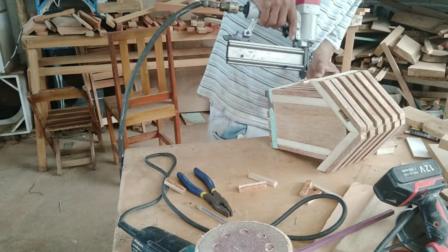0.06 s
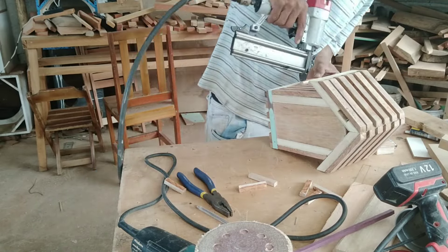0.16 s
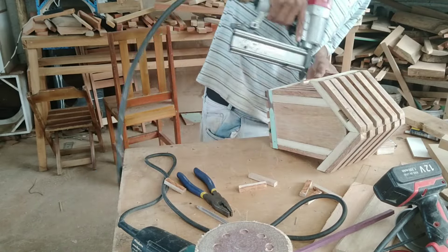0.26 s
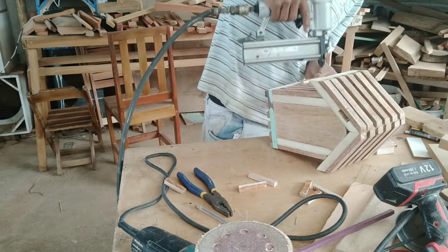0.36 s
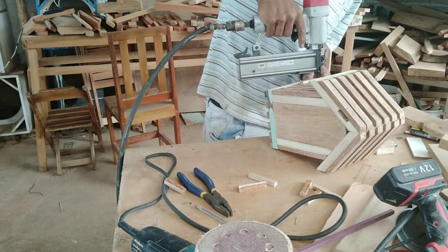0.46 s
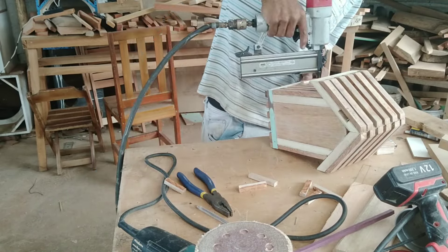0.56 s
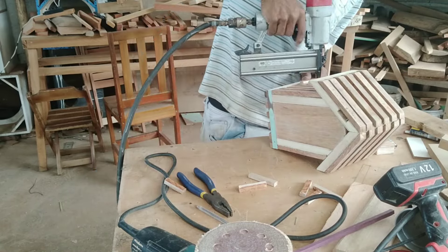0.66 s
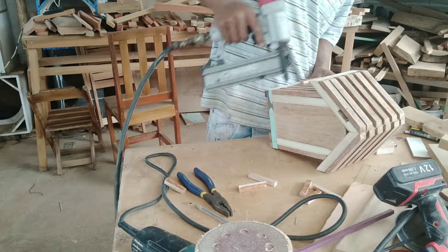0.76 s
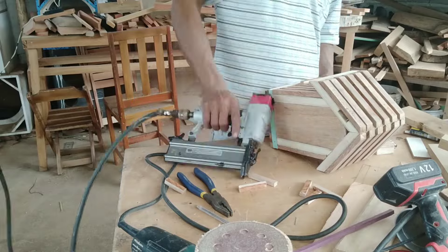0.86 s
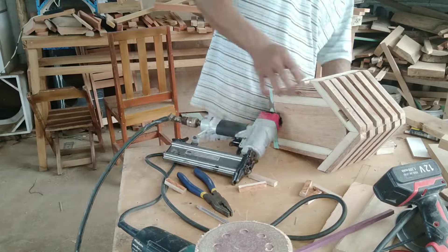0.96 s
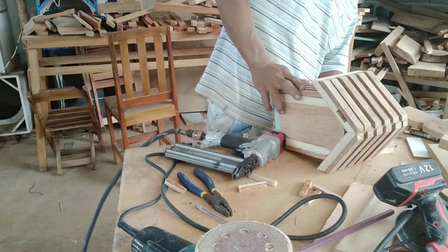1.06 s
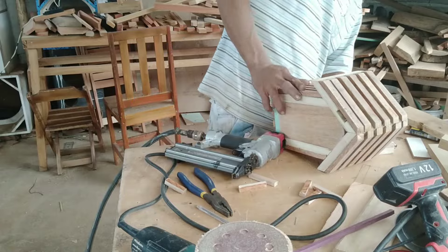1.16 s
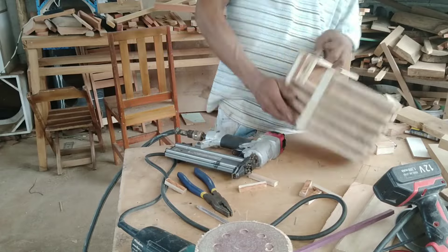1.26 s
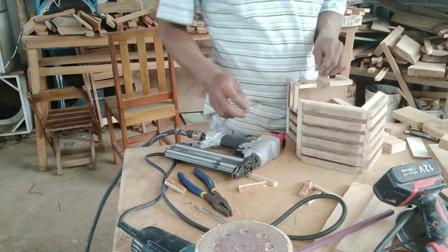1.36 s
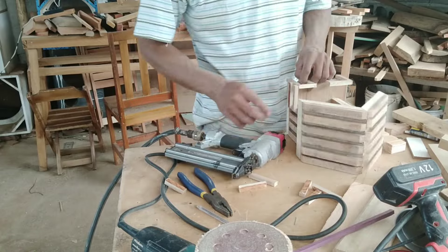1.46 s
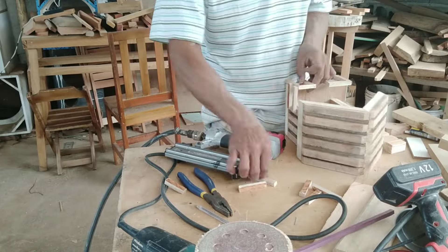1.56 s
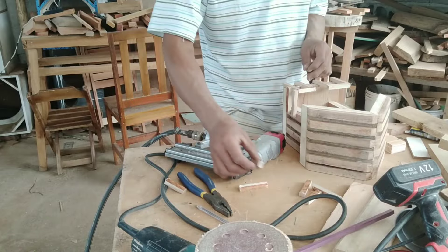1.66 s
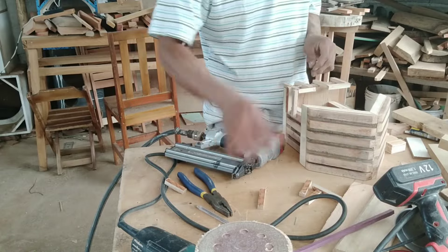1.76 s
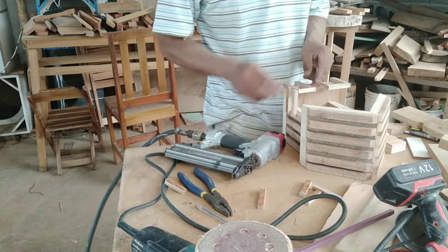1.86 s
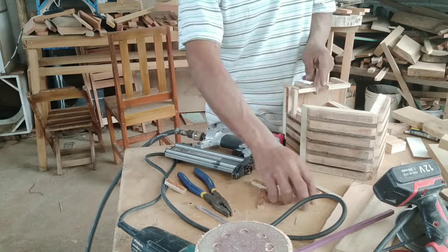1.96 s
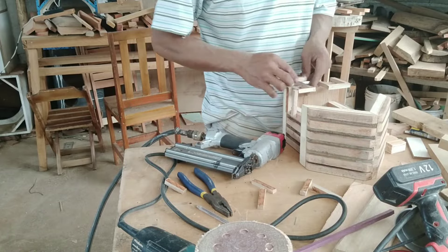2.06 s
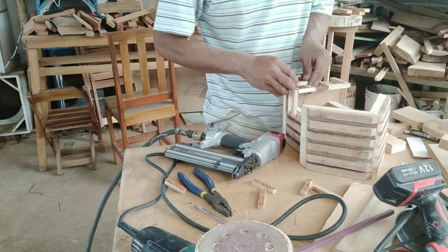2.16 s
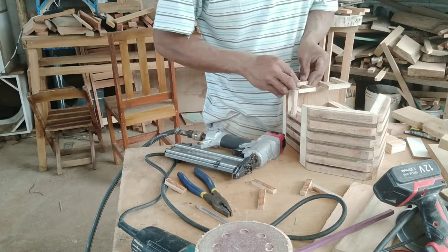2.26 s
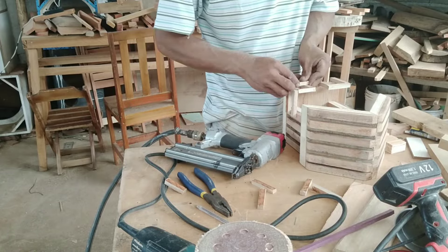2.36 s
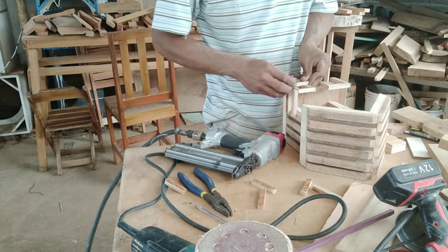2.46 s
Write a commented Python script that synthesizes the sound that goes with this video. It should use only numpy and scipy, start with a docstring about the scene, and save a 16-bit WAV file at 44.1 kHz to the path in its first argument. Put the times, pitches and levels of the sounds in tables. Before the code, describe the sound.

An air nailer fires twice, close and slightly overloaded, the first shot harder. It is set down on a wooden bench, a slatted box knocks over upright, then faint slat rubs, in a dry cluttered workshop.

```python
"""In a workshop, an air nailer fires twice into a slatted wooden box, close to the microphone.
Each shot mixes valve air and exhaust (shaped noise), driver blows (noise, gliding sine, ringing modes)
and piston thumps (modes). The nailer is put down on the bench and the box is tipped upright: noise
knocks over ringing modes. A small slat is picked up and rubbed into place with gritty noise and a
wavering squeak. Rumble, a changing hiss and a faint, dull, unevenly wavering noise lie beneath."""
import sys
import numpy as np
from scipy import signal
from scipy.fft import rfft, irfft
from scipy.io import wavfile
from scipy.ndimage import uniform_filter1d

SR = 44100
rng = np.random.default_rng(int(sys.argv[2]) if len(sys.argv) > 2 else 0)


def wav_out(sig):
    """Save sig, one row per channel (or a flat mono array), as 16-bit PCM at SR to the path in sys.argv[1]."""
    wavfile.write(sys.argv[1], SR, np.round(np.clip(np.atleast_2d(sig).T, -1, 1) * 32767).astype(np.int16))


N = 110250  # samples, 2.5 s


def amp(db):
    """Decibels to gain."""
    return 10 ** (np.asarray(db) / 20)


def unit(x):
    """Scales to rms 1."""
    return x / np.sqrt(np.mean(x ** 2) + 1e-20)


def read(points, hz):
    """Reads a table on a log-frequency axis."""
    f, value = np.transpose(points)
    return np.interp(np.log(hz + 1), np.log(f), value)


def silence():
    """An empty two-port track."""
    return np.zeros((2, N))


def add(mix, s, sound):
    """Mixes a sound in at s seconds, cut off where the track ends."""
    part = mix[:, max(round(s * SR), 0):][:, :sound.shape[-1]]
    part += sound[..., :part.shape[1]]


def clock(size=16384):
    """Time axis of one event in seconds."""
    return np.arange(size) / SR


# How alike the two microphone ports hear noise. Each row: frequency in Hz, likeness (limited to 0..1).
LIKENESS = [(60, 0.73), (150, 0.93), (300, 1.02), (650, 0.6), (1400, 0.38), (3000, 0)]


def noise(spectrum, tilt_db=0, size=16384):
    """Coloured noise of rms 1, alike at both ports in the bass and unlike in the treble."""
    hz = np.fft.rfftfreq(size, 1 / SR)
    a, b = rfft(rng.standard_normal((2, size)))
    same = np.clip(read(LIKENESS, hz), 0, 1)
    pair = np.array([a, same * a + np.sqrt(1 - same ** 2) * b])
    tilt = tilt_db * np.log2(np.maximum(hz, 300))  # dB per octave above 300 Hz
    return unit(irfft(pair * amp(read(spectrum, hz) + tilt), size))


def envelope(rise, hold, t60):
    """Linear attack, hold until `hold` seconds from the start, then exponential release."""
    t = clock()
    return np.minimum(t / rise, 1) * amp(-60 * np.maximum(t - hold, 0) / t60)


def grain(depth_db, size=40):
    """Uneven level of turbulence or friction, smoothed over `size` samples."""
    swing = unit(uniform_filter1d(rng.standard_normal(len(clock())), size))
    return unit(amp(depth_db * swing))


def ring(modes, pitch=1, detune=.004):
    """Dying modes of a struck object, each detuned a little at every blow."""
    t, out = clock(), 0
    for hz, db, t60 in modes:
        mode_hz = hz * pitch * (1 + detune * rng.uniform(-1, 1))
        out = out + amp(db - 60 * t / t60) * np.sin(2 * np.pi * mode_hz * t)
    return out


# Colour of the low rumble. Each row: frequency in Hz, level in dB.
RUMBLE = [(20, 3), (65, 3.5), (105, 3.5), (150, -7.5), (280, -13.5), (700, -17.5), (1100, -32), (4000, -64)]
# Colour of the hiss. Each row: frequency in Hz, level in dB.
HISS = [(130, 6), (280, -3.5), (550, 3.5), (900, -2), (2600, -4), (3600, -16.5), (5500, -22), (8000, -35),
        (16000, -48.5)]
# Level curve of the hiss. Each row: time in seconds, level in dB.
HISS_LEVEL = [(0, -42), (1.06, -45), (1.119, -81), (1.249, -66.5), (1.338, -34.5), (1.42, -75.5),
              (1.531, -63.5), (1.6, -53.5), (2.01, -52), (2.08, -84)]
# Colour of wood rubbing on wood, also darkened here for the wavering noise.
# Each row: frequency in Hz, level in dB.
RUB = [(150, -13), (300, -8), (480, 6.5), (900, 2.5), (2100, 4.5), (3200, -3.5), (5500, -5.5),
       (7000, -22.5), (16000, -58.5)]
RUMBLE_DB, WAVER_DB, WAVER_SWING_DB = -46, -68.5, 2


def background():
    """A steady low rumble, a hiss that sinks and returns, and a faint, dull, unevenly wavering noise."""
    hiss_db = np.interp(np.arange(N) / SR, *np.transpose(HISS_LEVEL))
    swing = unit(uniform_filter1d(rng.standard_normal(N), size=2000))
    rumble = amp(RUMBLE_DB) * noise(RUMBLE, size=N)
    hiss = amp(hiss_db) * noise(HISS, size=N)
    waver = amp(WAVER_DB + WAVER_SWING_DB * swing) * noise(RUB, tilt_db=-8, size=N)
    return rumble + hiss + waver


# Decay of the workshop. Each row: frequency in Hz, t60 in seconds.
ROOM = [(60, 0.12), (1500, 0.076), (6000, 0.084), (16000, 0.07)]


def room(x):
    """Short diffuse tail of the cluttered workshop: noise dying at its own rate in each band."""
    hz, t, z = signal.stft(rng.standard_normal((2, SR // 2)), SR, nperseg=256)
    decay = amp(-60 * t / read(ROOM, hz)[:, None])
    tail = signal.istft(z * decay, SR, nperseg=256)[1]
    tail = tail * np.minimum(np.arange(tail.shape[1]) / SR / 0.0074, 1)  # fades in over 7.4 ms
    return signal.fftconvolve(x, tail / np.linalg.norm(tail[0]), axes=1)[:, :N]


ECHO_DB, ECHO_SPAN_S = -9, .004


def near_echoes(x, count=6):
    """The bench and slats throw the treble back within milliseconds, differently to each port."""
    hz = np.fft.rfftfreq(N, 1 / SR)
    delay = ECHO_SPAN_S * (np.arange(count) + rng.uniform(0.082, 1, (2, count))) / count
    echoes = np.exp(-2j * np.pi * delay[..., None] * hz).sum(1) / np.sqrt(count)
    share = amp(ECHO_DB) * hz ** 2 / (hz ** 2 + 2000 ** 2)  # echoes favour the treble
    return irfft(rfft(x) * (1 + share * echoes) / np.sqrt(1 + share ** 2), N)


# Colour of the box dragging on the bench. Each row: frequency in Hz, level in dB.
DRAG = [(500, -13.5), (900, -1), (1500, -16), (4000, -50)]
DRAG_S, DRAG_LEN_S, DRAG_DB = 1.07, 0.16, -56


def box_drag():
    """The box dragged round on the bench: dull noise with slow, uneven friction."""
    out = silence()
    scrape = noise(DRAG) * envelope(0.0102, DRAG_LEN_S, .1) * grain(3.1, size=400)
    add(out, DRAG_S, amp(DRAG_DB) * scrape)
    return out


# Strokes of the slat. Each row: start in seconds, length in seconds, level in dB, tilt in dB per octave.
RUBS = [(1.547, 0.015, -51.5, -5.5), (1.741, 0.024, -41.5, -2), (1.9414, 0.016, -33.5, -2.5),
        (2.445, 0.009, -60, -6.5)]


def slat_rubs():
    """Short strokes of wood on wood: noise with fine gritty friction, coloured by RUB."""
    out = silence()
    for s, length, db, tilt in RUBS:
        add(out, s, amp(db) * noise(RUB, tilt) * envelope(0.0026, length, 0.033) * grain(2.1))
    return out


SQUEAK_S, SQUEAK_LEN_S, SQUEAK_HZ, SQUEAK_DB = 2.42, 0.0507, 780, -50
SQUEAK_WOBBLE = 0.018  # rms pitch wander, as a fraction of the pitch


def slat_squeak():
    """A faint squeak as the slat seats: a wavering tone and its octave, roughened by friction."""
    out = silence()
    wobble = unit(uniform_filter1d(rng.standard_normal(len(clock())), 300))
    turn = 2 * np.pi * np.cumsum(SQUEAK_HZ * (1 + SQUEAK_WOBBLE * wobble)) / SR
    tone = np.sin(turn) + 0.51 * np.sin(2 * turn)
    shape = envelope(0.0034, SQUEAK_LEN_S, 0.027) * grain(3.1, size=400)
    add(out, SQUEAK_S, amp(SQUEAK_DB) * tone * shape)
    return out


# Soft bumps against the bench. Each row: start in seconds, level in dB.
BUMPS = [(0.807, -41.5), (0.898, -35.5), (1.603, -40)]
# Modes of the bench. Each row: frequency in Hz, level in dB, t60 in seconds.
BENCH = [(116, 3, 0.44), (137.8, 7, 0.088), (208, 0.5, 0.21)]


def bench_bumps():
    """Soft bumps that swell gently into the low modes of the bench."""
    out = silence()
    for s, db in BUMPS:
        add(out, s, amp(db) * ring(BENCH) * envelope(0.0053, .05, 0.34))
    return out


# Fingers and loose slats tapping.
# Each row: start in seconds, level in dB, tilt in dB per octave, ring in dB relative to the tap.
TAPS = [(1.181, -43, 0, -16), (1.2618, -31, 0, -14), (1.5845, -32, -2, -26)]
# Colour of a tap. Each row: frequency in Hz, level in dB.
TAP = [(150, -2.5), (300, -1), (650, 6.5), (1000, 0), (1600, -16.5), (3500, -34), (16000, -54)]
# Mode of the tapped slat. Each row: frequency in Hz, level in dB, t60 in seconds.
TAP_RING = [(633.5, 6.5, 0.36)]
TAP_T60 = 0.036  # s


def slat_taps():
    """A short noise tap, with the slat chattering as it rings."""
    out = silence()
    for s, db, tilt, ring_db in TAPS:
        tap = noise(TAP, tilt) * envelope(0.0012, 0.0016, TAP_T60)
        chatter = amp(ring_db) * ring(TAP_RING) * grain(1.5, size=150)
        add(out, s, amp(db) * (tap + chatter))
    return out


# The box knocking on the bench. Each row: start in seconds, level in dB, treble tilt in dB per octave,
# boom in dB relative to the knock, boom pitch ratio.
KNOCKS = [(1.027, -20, 3, -7.5, 1.1), (1.036, -27, 4.5, 5, 1.04), (1.0465, -21.5, -0.5, 3.5, 1.2),
          (1.061, -30, 1.5, 1.5, 1.2), (1.3, -25.5, 1.5, -1.5, 1.2), (1.306, -21, 0.5, -1, .9),
          (1.3225, -12, -6, -7, 1.39), (1.3297, -13.5, 2, 2.5, 0.963), (1.3415, -22, 0.5, 0, 1)]
# Colour of the wooden knock. Each row: frequency in Hz, level in dB.
WOOD = [(30, -25), (90, 3), (200, 0.5), (400, -3), (750, -5.5), (1200, -17), (2300, -27.5), (4000, -47),
        (8500, -61.5), (16000, -100)]
# Modes of the box. Each row: frequency in Hz, level in dB, t60 in seconds.
BOX = [(120.85, -5, 0.17), (192, -1, 0.053), (247.7, -4, 0.069), (347, -5.5, 0.06), (524, -12, 0.03),
       (724, -16.5, .047)]
WOOD_T60, SCATTER_S = 0.04, 0.0071  # knock decay and hold in s


def box_knocks():
    """The box knocks and booms on the bench, its pitch set by the edge that lands."""
    out = silence()
    for s, db, tilt, boom_db, pitch in KNOCKS:
        knock = noise(WOOD, tilt) * envelope(0.0013, SCATTER_S, WOOD_T60)
        add(out, s, amp(db) * (knock + amp(boom_db) * ring(BOX, pitch)))
    return out


# The nailer touching the bench. Each row: start in seconds, level in dB.
TOUCHES = [(0.8797, -23), (.886, -27.5), (0.894, -27.5)]
# Colour of a touch. Each row: frequency in Hz, level in dB.
TOUCH = [(50, -2), (150, 7), (300, -4.5), (700, -2.5), (1120, 0.5), (1700, -15.5), (6000, -22.5),
         (16000, -46.5)]
# Modes rung by a touch. Each row: frequency in Hz, level in dB, t60 in seconds.
TOUCH_RING = [(592, -23, 0.2), (1130, -6, .035), (4200, -39, 0.28), (9152, -42, 0.22), (13800, -49, .16)]
TOUCH_T60 = 0.04  # s


def put_down():
    """The nailer lands on the bench in three quick touches and rings unevenly."""
    out = silence()
    for s, db in TOUCHES:
        knock = noise(TOUCH) * envelope(0.0014, 0.0019, TOUCH_T60)
        add(out, s, amp(db) * (knock + ring(TOUCH_RING) * grain(4, size=500)))
    return out


# The piston thumping back. Each row: start in seconds, level in dB.
RETURNS = [(0.284, -14), (0.7004, -10.5)]
# Modes of the thump. Each row: frequency in Hz, level in dB, t60 in seconds.
RETURN_MODES = [(118, -5, 0.05), (205, 0, 0.025), (345, -1, 0.02), (1100, -2, .015)]


def piston_returns():
    """The piston thumps back, a quick cluster of damped modes."""
    out = silence()
    for s, db in RETURNS:
        add(out, s, amp(db) * ring(RETURN_MODES))
    return out


# Valve openings. Each row: start in seconds, length in seconds, level in dB.
VALVES = [(0.2307, .011, -27.5), (0.262, .008, -26.5), (0.6521, 0.019, -26.5)]
# Colour of the valve air. Each row: frequency in Hz, level in dB.
VALVE_AIR = [(200, 3.5), (700, -12), (2000, -3), (2900, 3.5), (4000, -5), (6000, -8.5), (16000, -24)]


def valve_spits():
    """Air spits through the opening valve: short turbulent noise."""
    out = silence()
    for s, length, db in VALVES:
        add(out, s, amp(db) * noise(VALVE_AIR) * envelope(.002, length, .05) * grain(1.5))
    return out


# Modes of the nailer, rung by the blow and by the exhaust.
# Each row: frequency in Hz, level in dB, t60 in seconds.
NAILER = [(621, -7.5, 0.25), (1017, -1.5, 0.05), (1234, -5, 0.1), (1362, -4, 0.17), (1680, -7, 0.089),
          (1900, -3, .06), (2570, -4.5, 0.083), (5143, -16, .04), (6040, -16.5, .025)]
# Exhaust blasts. Each row: start in seconds, length in seconds, level in dB, treble tilt in dB per octave.
EXHAUSTS = [(0.273, .019, -11.5, 0), (0.681, .021, -13.5, 1.5)]
# Colour of the jet. Each row: frequency in Hz, level in dB.
EXHAUST_AIR = [(30, -13.5), (120, 2), (330, -9), (750, -5), (1150, 3.5), (1600, -3), (2000, -9.5),
               (2600, -1), (4200, -9), (5500, -6.5), (9000, -11.5), (14000, -20.5), (16000, -35.5)]
# Colour of the jet's turbulent low push. Each row: frequency in Hz, level in dB.
BUFFET = [(25, -12), (110, -4), (340, -1), (600, -8.5), (2000, -54.5)]
EXHAUST_RISE_S, EXHAUST_T60 = .002, 0.027
SING_DB, BUFFET_DB = -4.5, -4.5  # within the blast


def exhaust_blasts():
    """A grainy air jet with a low turbulent push, its noise making the housing sing."""
    out = silence()
    for s, length, db, tilt in EXHAUSTS:
        jet = noise(EXHAUST_AIR, tilt) * grain(2.6)
        # white noise filtered through the nailer's ring
        housing = unit(irfft(rfft(rng.standard_normal(len(clock()))) * rfft(ring(NAILER))))
        blast = jet + amp(SING_DB) * housing + amp(BUFFET_DB) * noise(BUFFET)
        add(out, s, amp(db) * blast * envelope(EXHAUST_RISE_S, length, EXHAUST_T60))
    return out


# Driver blows. Each row: start in seconds, crack in dB, punch in dB, punch start in Hz,
# punch pitch after PUNCH_S in Hz, ring of the nailer in dB.
BLOWS = [(0.2401, -37.5, -23.5, 1150, 1200, -44), (0.244, -3.5, -1.5, 247.3, 1055, -26),
         (0.6637, -30.5, -19.5, 1750, 1744, -24)]
# Colour of the crack. Each row: frequency in Hz, level in dB.
CRACK = [(130, -11.5), (300, -7), (750, 6.5), (1300, 2), (2100, -16.5), (2700, -7), (4600, -19),
         (5900, -5.5), (7700, -28.5), (16000, -36)]
PUNCH_S, BLOW_HOLD_S, BLOW_T60 = .009, 0.0077, 0.007


def driver_blows():
    """The driver strikes: a noise crack, a sine punch gliding in pitch, and the ringing nailer."""
    out, t = silence(), clock()
    for s, crack_db, punch_db, start_hz, end_hz, ring_db in BLOWS:
        # the glide carries on to twice PUNCH_S
        punch_hz = start_hz * (end_hz / start_hz) ** np.minimum(t / PUNCH_S, 2)
        punch = np.sin(2 * np.pi * np.cumsum(punch_hz) / SR)
        add(out, s, amp(crack_db) * noise(CRACK) * envelope(.0005, BLOW_HOLD_S, BLOW_T60))
        # the punch leads the crack by 1 ms
        add(out, s - .001, amp(punch_db) * punch * envelope(0.002, PUNCH_S, BLOW_T60))
        add(out, s, amp(ring_db) * ring(NAILER))
    return out


SHOT_ROOM_DB, WOOD_ROOM_DB = -15.5, -16.5
BOX_LAG_S = .0002  # the box stands further to the right, so it reaches the left port later


def scene():
    """Shots and bench work with their near echoes, the room tail and the background."""
    left, right = box_knocks() + slat_taps() + bench_bumps() + box_drag() + slat_rubs() + slat_squeak()
    box = np.array([np.roll(left, round(BOX_LAG_S * SR)), right])
    shots = near_echoes(valve_spits() + driver_blows() + exhaust_blasts() + piston_returns())
    bench = near_echoes(put_down() + box)
    tail = room(amp(SHOT_ROOM_DB) * shots + amp(WOOD_ROOM_DB) * bench)
    return shots + bench + tail + background()


# Balance of the two microphone ports. Each row: frequency in Hz, left minus right in dB.
BALANCE = [(100, -0.5), (600, 0.5), (1000, 4.5), (1500, 10.5), (2300, 8.5), (3500, -3.5), (8000, 0),
           (16000, -0.5)]
LEFT_LAG_S, EDGE_HZ = .00013, 16000
CLIP_KNEE = 8.6  # higher is harder


def record(dry):
    """The left port is later and more nasal; the shots overload; then the band limit."""
    hz = np.fft.rfftfreq(2 * N, 1 / SR)
    lean = amp(read(BALANCE, hz) / 2)
    ports = np.array([lean * np.exp(-2j * np.pi * hz * LEFT_LAG_S), 1 / lean])
    x = irfft(rfft(dry, 2 * N) * ports)[:, :N]
    x = x / (1 + abs(x) ** CLIP_KNEE) ** (1 / CLIP_KNEE)
    lowpass = signal.firwin(511, EDGE_HZ, window=("kaiser", 9), fs=SR)
    return signal.oaconvolve(x, lowpass[None], "same")


dry = scene()
out = record(dry)
wav_out(out)
```